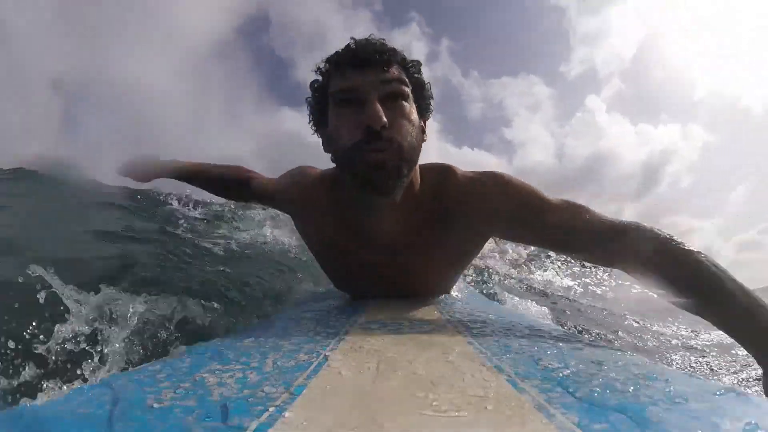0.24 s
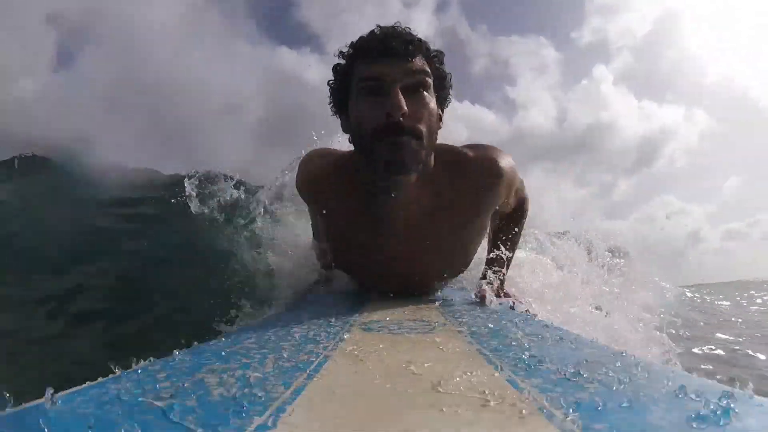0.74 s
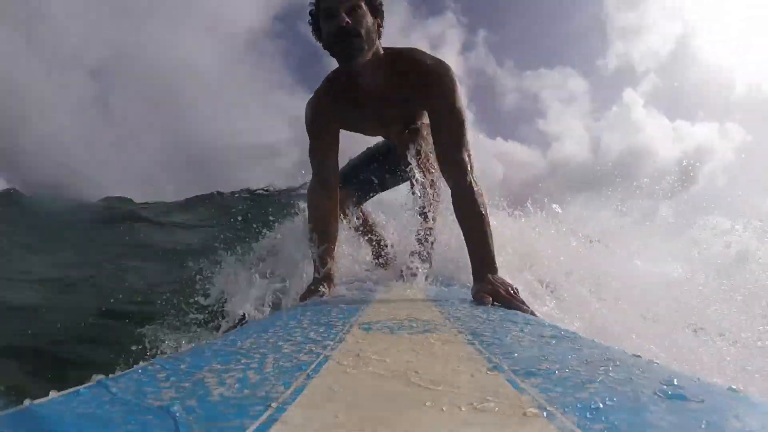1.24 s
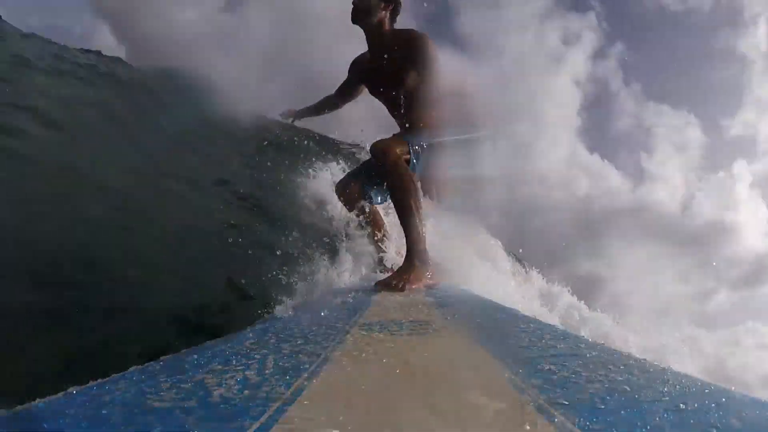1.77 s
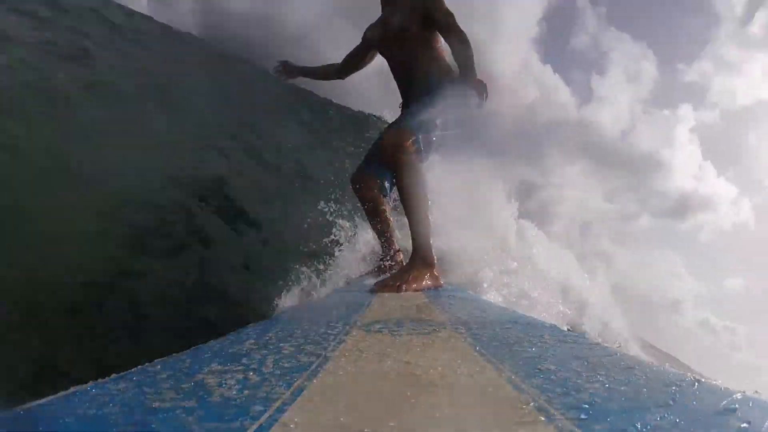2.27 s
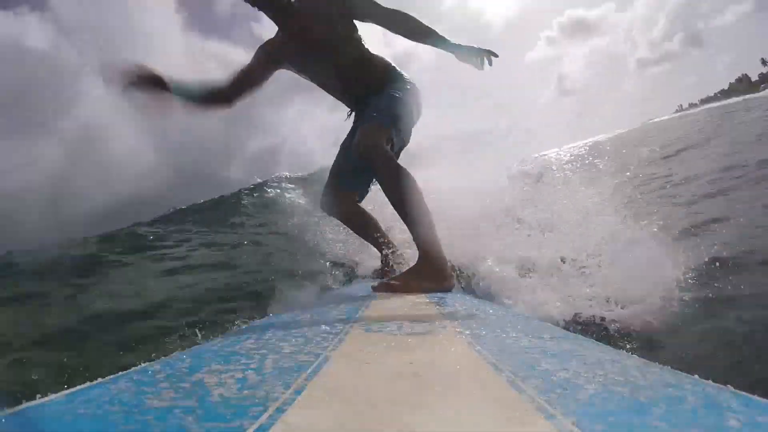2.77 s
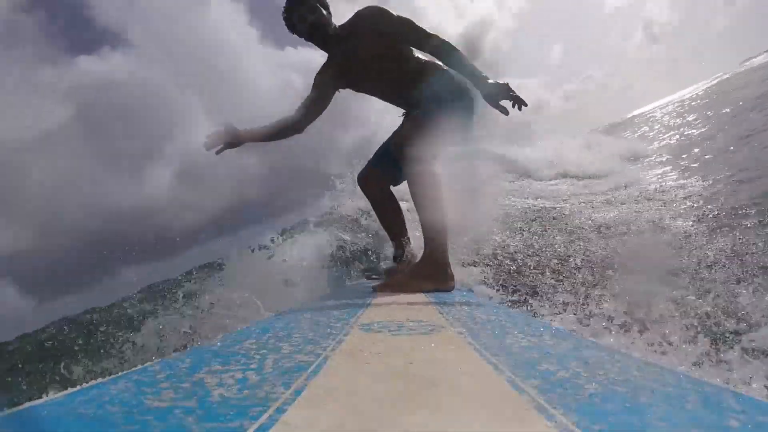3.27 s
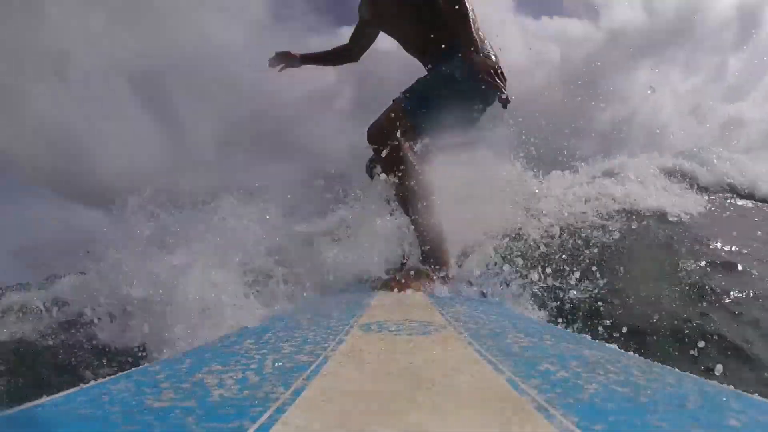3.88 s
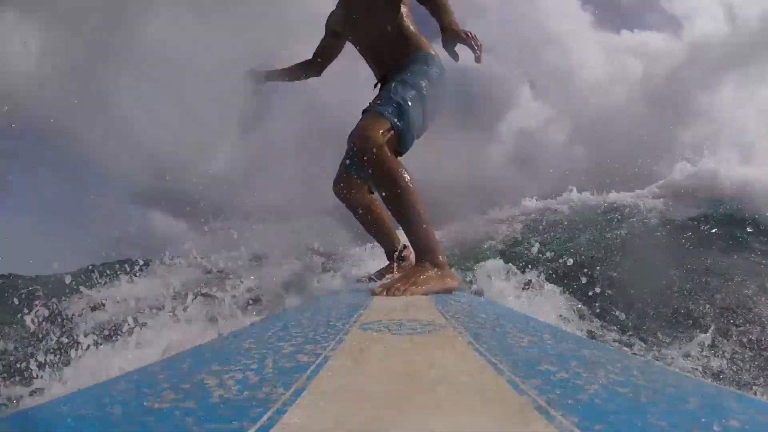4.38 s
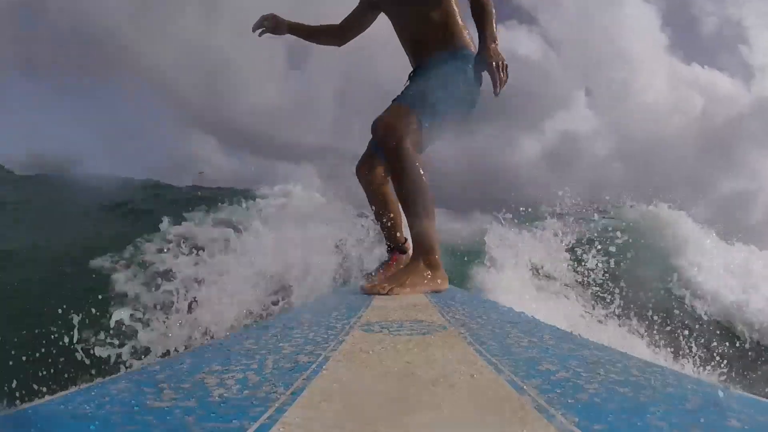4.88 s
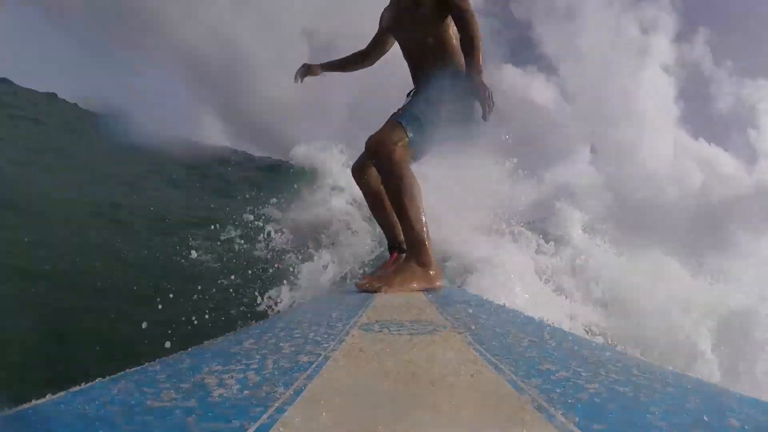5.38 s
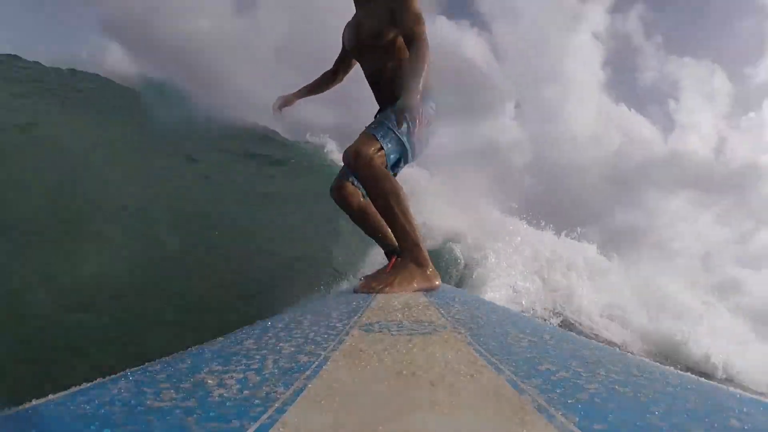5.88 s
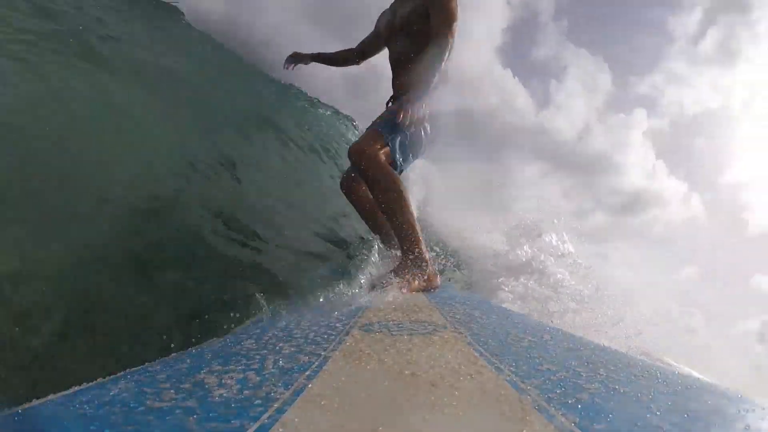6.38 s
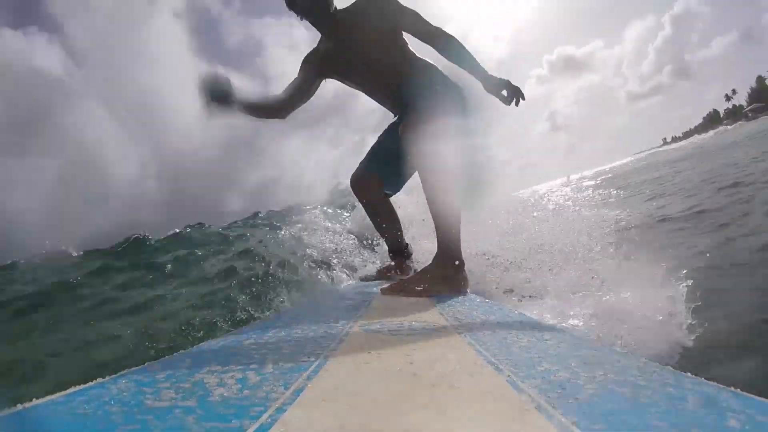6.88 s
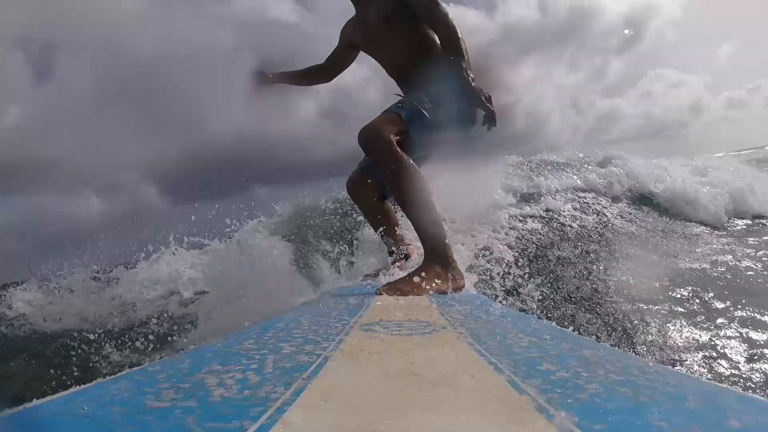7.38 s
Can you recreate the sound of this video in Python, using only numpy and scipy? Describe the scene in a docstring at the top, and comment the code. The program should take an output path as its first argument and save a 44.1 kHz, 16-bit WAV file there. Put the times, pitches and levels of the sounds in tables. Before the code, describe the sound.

Close on a surfboard's nose, a small waterproof camera's microphone hears water patter lightly, then deep hollow thumps and wet slaps as the rider pushes up. One massive low slam near 1.4 seconds briefly ducks everything. Then a rumbling wash, irregular deck knocks, small drop ticks and patchy foam fizz continue, with another cluster of thumps past four seconds and a low click at the end.

```python
"""On a surfboard dropping into a wave: a small waterproof camera on the nose hears the board and the water.
Chop thumps the hollow board as short low tone bursts; filtered noise rumbles and rattles its modes.
Slaps, short ticks, spray and foam are noise and ringing clicks heard through a wet microphone port,
whose water film cuts a wobbling notch and then runs off; a low click comes at the end. The camera's
gain control ducks one block ahead of the hardest slams and recovers slowly."""
import sys
import numpy as np
from scipy import signal
from scipy.fft import rfft, irfft, next_fast_len
from scipy.io import wavfile
from scipy.ndimage import uniform_filter1d, map_coordinates

SR = 44100
rng = np.random.default_rng(int(sys.argv[2]) if len(sys.argv) > 2 else 0)


def file_out(sig):
    """Save sig as 16-bit WAV at sys.argv[1]."""
    # one column per channel
    cols = np.atleast_2d(sig).T
    # limit, then scale
    lim = np.clip(cols, -1, 1)
    pcm = np.round(lim * 32767).astype(np.int16)
    wavfile.write(sys.argv[1], SR, pcm)


def invert_db(level):
    """Linear amplitude ratio for a level in decibels (20 dB per decade), elementwise."""
    return 10 ** (np.asarray(level, dtype=float) / 20)


N = 336483  # length in samples

# All levels in the tables are those before the gain control.
# hull thumps, and at 7.612 the low click at the end:
# centre_s, level_db, pitch_hz, length_ms (width at half height)
LOW_BURSTS = [(0.685, -13, 85.5, 14), (0.801, 5.5, 91, 14.5), (0.855, -5, 73.5, 11),
              (1.051, -5.5, 81.6, 11), (1.153, -10.5, 85, 75), (1.412, 20, 71, 22), (2.699, -13, 78, 23),
              (2.804, -2.5, 85.2, 49), (2.936, -10, 64.5, 27), (3.094, -6.5, 89, 10), (3.439, -5, 78, 29),
              (3.863, -6.5, 101, 23), (4.132, -9, 96.4, 53), (4.174, -7.5, 78, 23), (4.24, -11.5, 88.5, 73),
              (4.355, 3, 69, 14), (4.409, -1.5, 65, 24), (4.473, 6.5, 81.6, 36), (4.528, -0.5, 85, 37),
              (4.798, -9.5, 92.3, 43), (5.139, -1.5, 84.3, 29), (5.208, -9.5, 83, 36), (5.251, -8, 95, 36),
              (5.58, -8.5, 64, 28), (5.63, -12.5, 76, 38), (5.7, -10, 96.4, 40), (5.75, -13, 95.5, 13),
              (6.393, -11, 82, 19), (6.586, -11.5, 78, 26), (6.66, -15, 84, 50), (6.82, -8.5, 74.4, 30),
              (6.869, -9.5, 65.5, 31), (6.968, -12.5, 90, 28), (7.014, -9.5, 97, 55),
              (7.052, -11, 86.3, 46), (7.1, -12, 90, 27), (7.612, -7, 87, 44)]
# colour of the hull's rumble: pitch_hz, level_db (relative)
RUMBLE_COLOUR = [(12, -33.5), (22, -4), (40, -6.5), (62, -4.5), (93, -4.5), (112, -2), (135, -20),
                 (250, -37.5), (600, -120)]
# the loudest wet slaps on the deck, ahead of the port: start_s, level_db, crack_db (added to level_db)
WET_SLAPS = [(0.099, -34, -3), (0.246, -15.5, -15), (0.613, -22, -3), (0.764, -3, -23), (0.845, -13, -19),
             (0.998, -8, -34), (1.114, -11, -33), (1.263, -23, -19.5), (1.791, -12.5, -14.5),
             (1.923, -16.5, -11), (2.371, -17.5, -14), (2.472, -29, -6), (2.658, -23, -7),
             (2.793, -12.5, -14), (2.839, -17, -25), (3.298, -14, -22), (3.406, -15.5, -29),
             (3.837, -18, -24), (3.925, -17, -15), (4.033, -15.5, -21), (4.132, -29, -16),
             (5.168, -18, -28), (5.35, -12, -25), (5.6, -16, -26), (5.634, -10.5, -14.5), (5.939, -18, -15),
             (6.193, -25, -12), (6.322, -19, -15), (6.351, -14.5, -22), (6.435, -14.5, -10.5),
             (6.994, -18, -27), (7.505, -17, -27.5), (7.6, -12, -16.5)]
# modes of the deck, the camera mount and the board's skin: pitch_hz, width_hz, level_db (relative)
DECK_MODES = [(156.4, 62.6, -2), (215.9, 25.6, 3.5), (315, 134, -8)]
MOUNT_MODES = [(433, 78.5, -3.5), (495.6, 109, -4.5)]
SKIN_MODES = [(660, 229, 4), (997, 258, 2), (1300, 710, -11.5)]
# wash along the board between the waves: time_s, rumble_db, patter_db (on the deck)
BOARD_WASH = [(0, -34.5, -41), (.5, -26, -29), (.9, -13.5, -37), (1.3, -19.5, -29), (1.6, -17, -22.5),
              (2.1, -22, -31), (2.7, -22.5, -30), (3.1, -22.5, -28), (3.7, -23.5, -29), (4.2, -17, -29.5),
              (4.65, -20, -32.5), (5.05, -28, -35), (5.4, -21, -28), (5.85, -30, -36), (6.4, -21.5, -29),
              (6.85, -20, -30.5), (7.3, -27, -37.5), (7.63, -17, -28.5)]
# small waves breaking on the board: centre_s, length_ms, deck_db, mount_db and skin_db (against the deck)
SMALL_WAVES = [(.12, 88, -28, -3.5, -6.5), (0.259, 56, -23, -12, -11.5), (0.671, 97, -20.5, -11.5, -8),
               (.79, 52, -11, -8, -18), (.85, 38, -17, -1, -4.5), (1.04, 300, -24, 0.5, -15.5),
               (1.33, 120, -39, 5, -15), (1.479, 79, -3.5, -20, -36), (1.959, 103, -21, -18, -9.5),
               (2.26, 80, -22.5, -25, -12.5), (2.5, 200, -23.5, -21, -19), (2.828, 127, -18, -10.5, -16.5),
               (2.98, 100, -23, -20, -36), (3.201, 49, -22, -22, -40), (3.422, 59, -23, -8, -12),
               (3.86, 80, -29, -1, -12), (4.14, 186, -24.5, -5, -10.5), (4.481, 95, -24, -6.5, -16),
               (4.818, 84, -23, -10, -19.5), (5.18, 109, -20, -7.5, -19), (5.379, 100, -31.5, 2, -10),
               (5.639, 86, -22, -16, -19), (5.961, 103, -28.5, -6, -10), (6.21, 90, -39, 7, -6),
               (6.45, 31, -27, 0, -12), (6.591, 98, -20, -25, -26), (7.0, 100, -24.5, -7, -13.5),
               (7.159, 36, -26, -15, -18), (7.3, 42, -25, -10.5, -14), (7.452, 87, -42.5, 10.5, -5.5)]
# short ticks: most from drops striking the housing, the broad ones at 2.755, 2.908 and 6.915 from gain steps;
# ahead of the port: start_s, level_db, pitch_hz, cycles (to fall 60 dB)
SHORT_TICKS = [(0.061, -28, 2500, 9.6), (0.471, -29.5, 6430, 29), (1.963, -30, 1860, 13),
               (2.275, -26.5, 6660, 18), (2.371, -29.5, 1610, 10), (2.658, -36, 2000, 8),
               (2.755, -24, 2470, 3.8), (2.908, -28.5, 2480, 2), (3.083, -28, 2010, 5.4),
               (3.601, -31.5, 6560, 43), (3.722, -30.5, 5440, 36), (4.06, -31, 1760, 33),
               (5.652, -22.5, 5650, 9.7), (6.326, -17, 7000, 4.6), (6.433, -37, 1910, 40),
               (6.441, -32, 2360, 46), (6.635, -30, 6500, 15), (6.727, -26, 6450, 12),
               (6.915, -25, 2470, 5.7)]
# level of the spray between 1.5 and 4 kHz, ahead of the port: time_s, level_db
FOAM_LEVEL = [(0, -51.5), (.52, -52.5), (.6, -47.5), (.72, -43.5), (.8, -47), (.96, -52.5), (1.04, -46.5),
              (1.3, -47), (1.4, -41), (1.62, -43.5), (1.84, -55.5), (1.92, -52.5), (2.0, -57.5),
              (2.24, -50), (2.48, -55.5), (2.8, -52.5), (2.95, -55), (3.45, -50), (3.68, -47.5),
              (3.86, -50), (4.14, -43.5), (4.3, -47.5), (4.55, -56), (4.75, -52.5), (4.9, -53.5),
              (5.2, -49), (5.62, -53.5), (5.68, -52.5), (5.78, -56.5), (6.0, -52.5), (6.4, -50.5),
              (6.56, -45), (6.8, -52.5), (7.63, -52)]
# colour of the spray: pitch_hz, level_db (relative)
SPRAY_COLOUR = [(400, -52.5), (900, 3), (1500, 1), (3000, -4), (4200, -9.5), (5000, -4.5), (7100, -4.5),
                (9300, -1.5), (12000, -2.5)]
# water film over the port, before it trembles: time_s, notch_hz
FILM_NOTCH = [(.001, 4650), (.12, 5150), (.171, 5650), (.268, 5760), (.372, 5080), (.455, 5920),
              (.552, 5620), (.69, 4520), (.768, 4620), (.808, 7900), (.836, 5900), (.868, 8800),
              (.932, 8900), (.968, 7500), (1.001, 7550), (1.028, 5350), (1.072, 4620), (1.105, 5080),
              (1.165, 4620), (1.355, 6050), (1.39, 7000), (1.412, 10200), (1.438, 9900), (1.468, 4450),
              (1.582, 3940), (1.66, 5100), (1.74, 6000), (1.792, 7300), (1.842, 7250), (1.895, 4680),
              (1.945, 5780), (2.02, 5950), (2.055, 5500), (2.09, 4570), (2.225, 4220), (2.292, 4560),
              (2.355, 6350), (2.405, 4620), (2.48, 4480), (2.601, 3880)]
# port resonances as the water in it shifts: time_s, low_db and high_db (each cavity against the direct sound)
PORT_CAVITIES = [(0, -25, 15), (.8, -27, 20.5), (.9, -27, 27), (1.05, -27, 18), (2.7, -25, 18),
                 (2.95, 5.5, 10), (3.66, 3, 9), (3.72, 11, 0), (6, 10, -0.5), (7.63, 14, 4)]


def unit(x):
    """Scale to an rms (average strength) of 1."""
    return x / np.sqrt(np.mean(np.abs(x) ** 2) + 1e-20)


def along(points, hz):
    """Read a (pitch_hz, value) curve on a log pitch axis."""
    point_hz, value = np.transpose(points)
    return np.interp(np.log(hz + 1), np.log(point_hz + 1), value)


def curves(rows, t):
    """Read each column after the time at times t."""
    time_s, *columns = np.transpose(rows)
    return [np.interp(t, time_s, column) for column in columns]


def wobble(rate):
    """A smooth random curve through `rate` random points a second (at most 40)."""
    points = rng.standard_normal(int(N * 40 / SR))
    return map_coordinates(points, [np.arange(N) * rate / SR])


def filtered(x, response):
    """Filter x by a response given as a function of frequency."""
    size = next_fast_len(N + 8192)
    spectrum = rfft(x, size) * response(np.fft.rfftfreq(size, 1 / SR))
    return irfft(spectrum, size)[:N]


def mode(f, hz, width):
    """One resonance that rings on after a hit, with gain 1 at its centre."""
    return 1j * f * width / (hz * hz - f * f + 1j * f * width)


def ring(f, modes):
    """Response of a set of modes, with the sound falling away outside their range."""
    total = 0
    for k, (hz, width, db) in enumerate(modes):
        total = total + (-1) ** k * invert_db(db) * mode(f, hz, width)  # signs alternate
    low_edge = 1j * f / (0.9 * modes[0][0] + 1j * f)
    high_edge = 1 / (1 + 1j * f / (0.81 * modes[-1][0]))
    return total * low_edge * high_edge


def churn(grains, scatter_db, share):
    """Water breaking into impacts: white noise mixed with `grains` random spikes a second."""
    size = invert_db(scatter_db * np.minimum(rng.exponential(size=N), 2))
    spikes = (rng.random(N) < grains / SR) * size * rng.choice([-1, 1], N)
    # share is the spikes' part of the power
    return np.sqrt(1 - share) * rng.standard_normal(N) + np.sqrt(share) * unit(spikes)


def sea():
    """Levels in dB of rumble, deck, mount and skin: the wash plus the power of a brief swell for every wave."""
    t = np.arange(0, N / SR + .01, .005)
    rumble_db, patter_db = curves(BOARD_WASH, t)
    # the patter is weaker on the mount and the skin than on the deck
    power = invert_db(2 * np.array([rumble_db, patter_db, patter_db - 6.5, patter_db - 14]))
    for centre_s, ms, deck_db, mount_db, skin_db in SMALL_WAVES:
        swell = np.exp(-4 * np.log(2) * (1000 * (t - centre_s) / ms) ** 2)
        wave_db = deck_db + np.array([1, 0, mount_db, skin_db])  # rumble 1 dB over the deck
        power += np.outer(invert_db(2 * wave_db), swell)
    return [np.interp(np.arange(N) / SR, t, 10 * np.log10(p)) for p in power]


def hull(level_db):
    """The board's lowest bending: a lumpy rumble with short thumps where it slaps the water, then the end click."""
    rumble = filtered(rng.standard_normal(N), lambda f: invert_db(along(RUMBLE_COLOUR, f)))
    lumps = invert_db(3.16 * wobble(14))
    half = SR // 8  # samples on either side of a burst's centre
    out = np.pad(invert_db(level_db) * unit(lumps * rumble), half)
    t = np.arange(-half, half) / SR
    signs = rng.choice([-1, 1], len(LOW_BURSTS))
    for (centre_s, db, hz, ms), sign in zip(LOW_BURSTS, signs):
        swell = np.exp(-4 * np.log(2) * (1000 * t / ms) ** 2)
        burst = sign * invert_db(db) * swell * np.cos(2 * np.pi * hz * t)
        start = round(centre_s * SR)
        out[start:][:len(t)] += burst[:len(out) - start]
    return out[half:][:N]


def slaps():
    """A puff of water knocks the hollow mount and deck, with a briefer crack on the skin."""
    out, t = np.zeros(N + SR), np.arange(8192) / SR
    f = np.fft.rfftfreq(len(t), 1 / SR)

    def struck(push, response):
        """What the push rings out of a part, scaled to peak 1."""
        sound = irfft(rfft(push) * response)
        return sound / np.abs(sound).max()

    crack_response = ring(f, SKIN_MODES) + .5 * mode(f, 1400, 900) ** 2
    for start_s, db, crack_db in WET_SLAPS:
        fade = invert_db(-60 * t / 0.064)  # falls 60 dB in 64 ms
        rise = 1 - np.exp(-t / 0.0032)
        puff = rng.standard_normal(len(t)) * fade * rise
        knock = 0.63 * struck(puff, ring(f, MOUNT_MODES)) + 0.6 * struck(puff, ring(f, DECK_MODES))
        short_puff = puff * invert_db(-60 * t / 0.045)
        crack = struck(short_puff, crack_response)
        out[round(start_s * SR):][:len(t)] += invert_db(db) * (knock + invert_db(crack_db) * crack)
    return out[:N]


def chop(levels_db, gust):
    """Small waves patter on the board; deck, camera mount and skin each ring in their own modes."""
    out = np.zeros(N)
    # the stiffer the part, the more single impacts stand out
    for modes, level_db, share in zip((DECK_MODES, MOUNT_MODES, SKIN_MODES), levels_db, (.4, .5, .7)):
        unrest = invert_db(1.05 * gust + 3.06 * wobble(22))
        patter = churn(grains=90, scatter_db=4.0, share=share) * unrest
        out += invert_db(level_db) * unit(filtered(patter, lambda f: ring(f, modes)))
    return out


def ticks():
    """Short ticks, most from drops and the broad ones from gain steps: a noisy click that rings a few cycles."""
    out, t = np.zeros(N + SR), np.arange(SR // 25) / SR
    for start_s, db, hz, cycles in SHORT_TICKS:
        tone = np.cos(2 * np.pi * hz * t)
        fade = invert_db(-60 * t * hz / cycles)
        tick = (tone + .5 * rng.standard_normal(len(t))) * fade
        out[round(start_s * SR):][:len(t)] += invert_db(db) * tick
    return out[:N]


def spray(level_db, gust):
    """Patchy fizz of foam and flying water: spiky noise, coloured and made uneven over time and pitch."""
    unrest = invert_db(0.65 * gust + 0.43 * wobble(5.6))
    water = churn(grains=900, scatter_db=10.0, share=0.27) * unrest
    f, t, z = signal.stft(water, SR, nperseg=512)
    patches = uniform_filter1d(rng.standard_normal(z.shape), 8, 0)  # smooth over pitch
    patches = uniform_filter1d(patches, 6, 1)  # smooth over time
    colour_db = along(SPRAY_COLOUR, f)[:, None] + 1.45 * unit(patches)
    fizz = signal.istft(z * invert_db(colour_db), SR, nperseg=512)[1][:N]
    body = filtered(fizz, lambda hz: (hz > 1500) & (hz < 4000))  # the band that sets the level
    return invert_db(level_db) * fizz / np.std(body)


def port(x):
    """The wet microphone port: a moving film notch, two ringing cavities and a steep upper edge."""
    f, t, z = signal.stft(x, SR, nperseg=512, noverlap=448)
    f = f[:, None]
    notch_hz, = curves(FILM_NOTCH, t)
    tremble = np.interp(t, np.arange(N) / SR, wobble(35))
    notch_hz = notch_hz * (1 + 0.035 * tremble)
    # the film cancels at its notch and rings a little below it
    ring_hz = 0.86 * notch_hz
    cancel = notch_hz ** 2 - f ** 2 + 1j * f * 130
    resonance = ring_hz ** 2 - f ** 2 + 1j * f * 1500
    film = np.abs(cancel / resonance * (ring_hz / notch_hz) ** 2)
    # the film runs off at 2.6 s, within 27 ms: its strength drops
    film = film ** np.interp(t, [2.6, 2.6 + 0.027], [1.1, 0.14])
    low_db, high_db = curves(PORT_CAVITIES, t)
    low_cavity = np.abs(1 + invert_db(low_db) * mode(f, 5555, 320))
    high_cavity = np.abs(1 + invert_db(high_db) * mode(f, 6565, 330))
    # a tighter film (higher notch) also lifts the upper edge
    edge_hz = 9600 + 0.42 * (np.minimum(notch_hz, 7000) - 4200)
    edge = 1 / (1 + (f / edge_hz) ** 100)
    # a very tight film weakens what lies above its notch
    edge = edge * invert_db(-.007 * np.maximum(notch_hz - 6300, 0) * (f > notch_hz))
    return signal.istft(z * film * low_cavity * high_cavity * edge, SR, nperseg=512, noverlap=448)[1][:N]


def scene():
    """Hull plus all that comes through the port; gusts of water shake chop and spray at once."""
    rumble_db, *chop_db = sea()
    spray_db, = curves(FOAM_LEVEL, np.arange(N) / SR)
    gust = wobble(15)
    wet = chop(chop_db, gust) + slaps() + spray(spray_db, gust) + ticks()
    return (hull(rumble_db) + port(wet))[None]


def low_pass(x):
    """Removes everything above the highest recorded frequency."""
    return signal.sosfilt(signal.butter(12, 10650, fs=SR, output="sos"), x)


def record(dry):
    """Gain steps down at a block edge so this block and the next stay under the ceiling, then glides back up."""
    ceiling_db, release_s = -5.5, .5
    block_s, first_edge_s = .032, .005
    edges = np.arange(first_edge_s - block_s, N / SR + 2 * block_s, block_s)
    edges = np.round(edges * SR).astype(int).clip(0, N)
    gain_db, held_db = np.zeros(N), 0.
    for a, b, c in zip(edges, edges[1:], edges[2:]):
        peak = np.abs(dry[0, a:c]).max(initial=1e-9)  # looks one block ahead
        room_db = ceiling_db - 20 * np.log10(peak)
        start_db = min(held_db, room_db)
        held_db = min(start_db * np.exp(-block_s / release_s), room_db)
        gain_db[a:b] = np.linspace(start_db, held_db, b - a)
    return low_pass(dry * invert_db(gain_db))


dry = scene()
out = record(dry)
file_out(out)
```